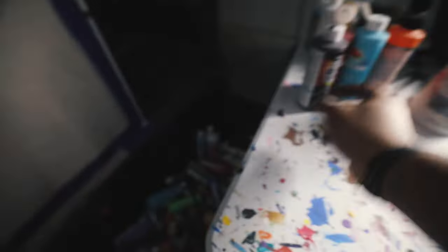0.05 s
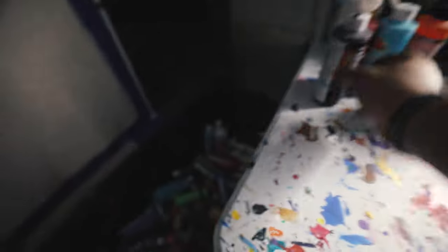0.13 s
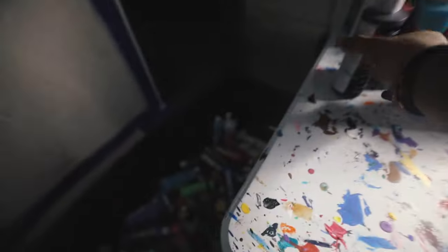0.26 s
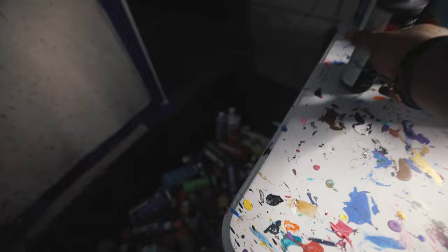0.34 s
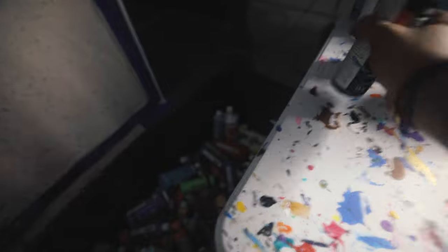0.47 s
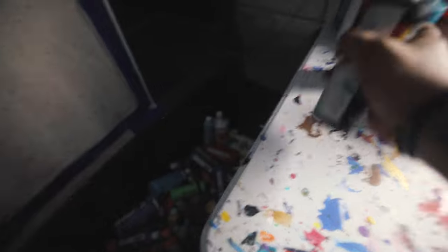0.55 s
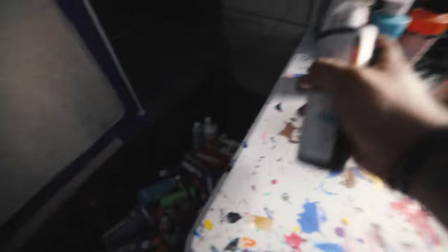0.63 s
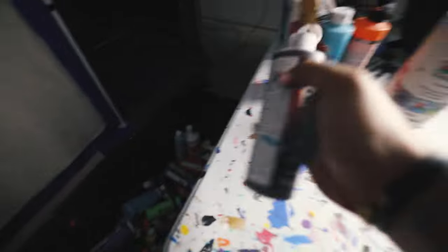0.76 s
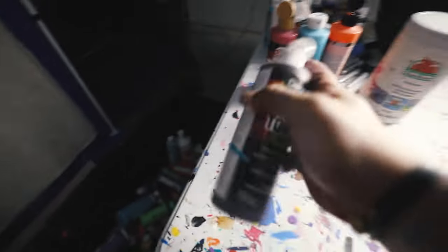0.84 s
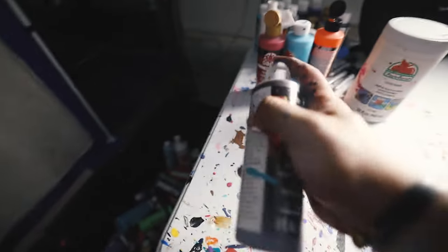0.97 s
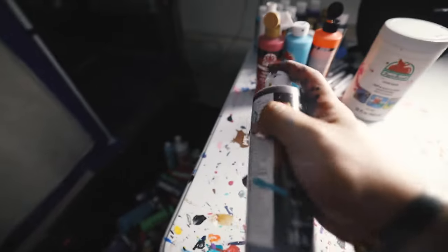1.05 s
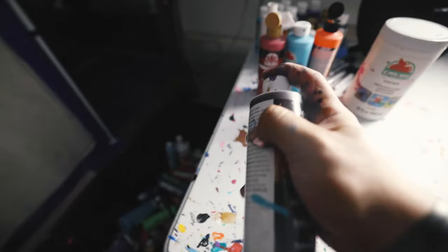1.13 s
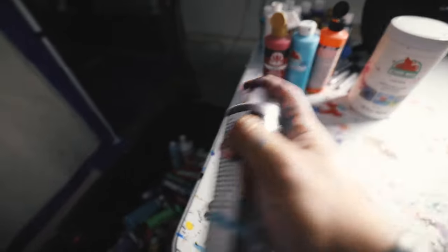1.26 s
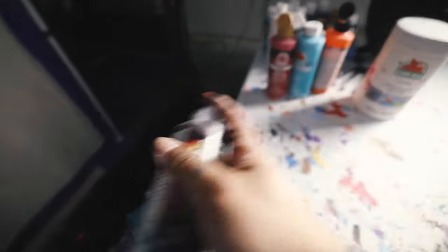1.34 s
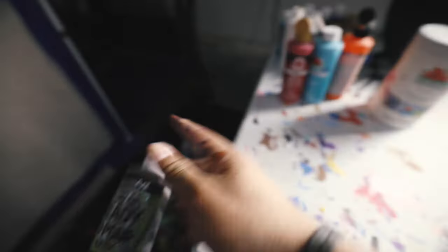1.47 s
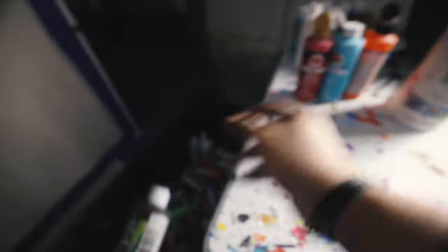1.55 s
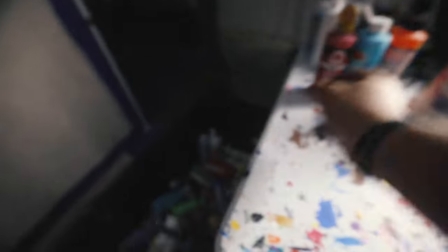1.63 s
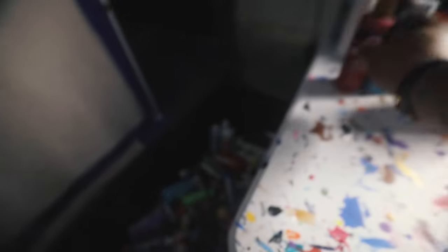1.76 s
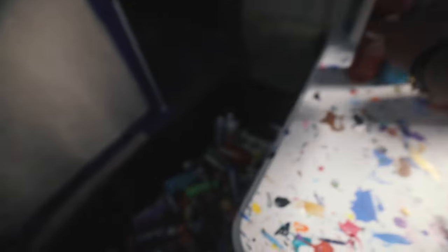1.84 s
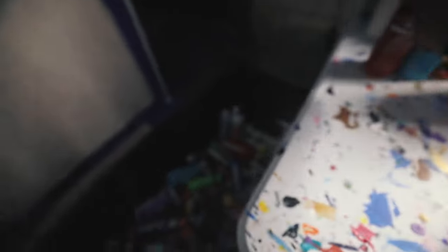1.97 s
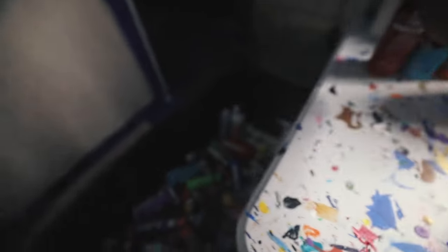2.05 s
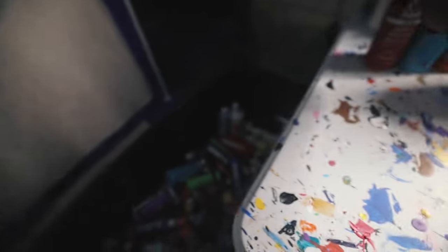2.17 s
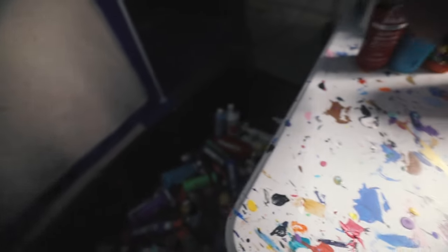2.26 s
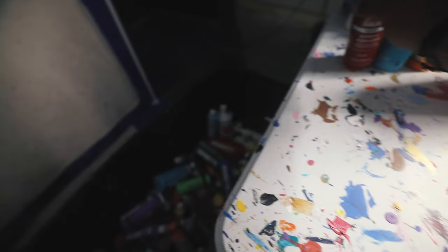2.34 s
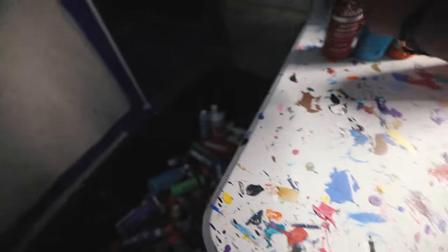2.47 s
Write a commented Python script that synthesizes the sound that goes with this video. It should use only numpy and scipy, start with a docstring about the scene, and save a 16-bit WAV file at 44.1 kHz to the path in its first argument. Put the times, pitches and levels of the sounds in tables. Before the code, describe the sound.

Two hollow plastic bottle set-downs on a light table, separated by a sharp cap click and puff

```python
"""Plastic squeeze bottles are set down on a light hollow tabletop: each rim touches, lands and rocks in small taps
of coloured noise, flat bases ring the bottle hollow, and the tabletop booms a moment later as a swelling low tone.
A bottle in the hand rustles as grainy hiss; its cap ticks and snaps as struck resonances and lets out a puff of air.
A small hard room answers with decaying noise, over a faint mains hum and room air made of filtered noise."""
import sys
import numpy as np
from scipy import signal
from scipy.fft import rfft, irfft, next_fast_len
from scipy.io import wavfile
from scipy.ndimage import map_coordinates

SR = 44100
rng = np.random.default_rng(int(sys.argv[2]) if len(sys.argv) > 2 else 0)


def put_to_file(sound):
    """Save the sound as 16-bit audio at rate SR, in the file named by the first command-line argument."""
    columns = np.atleast_2d(sound).T  # one column per channel
    safe = np.clip(columns, -1, 1)
    whole_steps = np.round(safe * 32767)
    wavfile.write(sys.argv[1], SR, whole_steps.astype(np.int16))


def gain_from_decibels(decibels):
    """Convert decibel values to linear amplitude factors."""
    exponent = np.asarray(decibels, float) / 20
    return 10 ** exponent


N = 110250
SECONDS = np.arange(N) / SR


def unit(x):
    """Normalisation: scales a signal to rms 1."""
    return x / np.sqrt(np.mean(x ** 2) + 1e-20)


def along(points, hz):
    """Interpolation of (Hz, value) points on a logarithmic frequency axis."""
    f, v = np.transpose(points)
    return np.interp(np.log(hz + 1), np.log(f + 1), v)


def filtered(x, response):
    """Linear filtering: multiplies the spectrum of x by a response of frequency."""
    m = next_fast_len(len(x) + 4096)
    spectrum = rfft(x, m) * response(np.fft.rfftfreq(m, 1 / SR))
    return irfft(spectrum, m)[:len(x)]


def coloured_noise(length, spectrum):
    """Spectral shaping: white noise filtered to a table of (Hz, dB), at rms 1."""
    return unit(filtered(rng.standard_normal(length), lambda hz: gain_from_decibels(along(spectrum, hz))))


def wobble(rate):
    """Slow random modulation: a smooth curve through random knots, rate of them a second."""
    knots = rng.standard_normal(int(N * rate / SR) + 4)
    return map_coordinates(knots, [SECONDS * rate])


def modes(table, order=1):
    """Modal superposition: the causal response of summed (Hz, width in Hz, dB) resonances."""
    def response(f):
        total = 0
        for k, (centre, width, db) in enumerate(table):
            resonance = 1j * f * width / (centre ** 2 - f ** 2 + 1j * f * width)
            sign = (-1) ** (k * order)  # order 1 alternates in polarity
            total = total + sign * gain_from_decibels(db) * resonance ** order
        return total
    return response


def tilt(hz, db_per_octave):
    """Spectral slope: pivots about 2 kHz and is flat below 800 Hz."""
    return gain_from_decibels(db_per_octave * np.log2(np.maximum(hz, 800) / 2000))


def add(track, s, sound):
    """Superposition: mixes a sound into the track at s seconds."""
    part = track[round(s * SR):][:len(sound)]
    part += sound[:len(part)]


def room(x):
    """Reverberation: convolves x with a noise tail in which each frequency decays at its own speed."""
    # Reverberation time. Each row: frequency in Hz, time to fall by 60 dB in seconds.
    decay_times = [(150, 0.81), (1000, 0.37), (4000, 0.44), (9000, 0.3), (16000, 0.33)]
    hz, t, z = signal.stft(rng.standard_normal(SR // 2), SR, nperseg=256)
    decay = gain_from_decibels(-60 * t / along(decay_times, hz)[:, None])
    tail = signal.istft(z * decay, SR, nperseg=256)[1]
    return signal.fftconvolve(x, tail / np.linalg.norm(tail))


def background():
    """Stationary noise: broadband room air, and a hum unsteady because it is narrow-band noise."""
    # Spectrum of the room air. Each row: frequency in Hz, relative density in dB per Hz.
    air_spectrum = [(18, -109), (30, -21), (125, 0.5), (235, -17.5), (298, -14.5), (409, -22.5),
                    (443, -27.5), (792, -24), (858, -19), (1310, -25), (1750, -31.5), (2890, -32.5),
                    (7470, -49.5), (14800, -51), (16500, -87)]
    # Mains hum. Each row: frequency in Hz, level in dB, bandwidth in Hz.
    hum_bands = [(115.3, -49, 8.9)]
    air_level_db = -43 + 0.17 * wobble(0.6)
    air = gain_from_decibels(air_level_db) * coloured_noise(N, air_spectrum)
    hum = np.zeros(N)
    for hz, db, width in hum_bands:
        band = filtered(rng.standard_normal(N), modes([(hz, width, 0)], order=2))
        hum += gain_from_decibels(db) * unit(band)
    return air + hum


def taps():
    """Frequency-dependent damping: each rim contact is a noise rattle whose treble dies first, with a room tail."""
    # Rim contacts. Each row: start in seconds, relative level in dB, brightness in dB per octave.
    contacts = [(.013, -20.5, -0.5), (.023, -24.5, -1), (0.2033, -8.5, 3.5), (.22, -5, 0.4),
                (.234, -16, -3.5), (0.247, -18.5, -0.5), (.369, -24, -5), (.442, -26.5, 2.5),
                (.447, -21.5, 2.5), (0.456, -22, -5), (0.469, -19, 1.7), (.496, -18.5, -3),
                (0.512, -22.5, -0.5), (0.538, -19.5, 0), (0.547, -29.5, -1.5), (0.644, -30, -11),
                (1.867, -6.5, 3.5), (1.884, -2, 3), (1.904, -15.5, -4.5), (1.915, -8.5, 2.6),
                (1.934, -20.5, 2.5), (1.954, -23.5, -10), (1.99, -20.5, -5), (2.039, -23.5, 0),
                (2.051, -29.5, -0.5), (2.111, -19, 2.5), (2.14, -26, -1), (2.226, -45, -1),
                (2.237, -23.5, 0), (2.27, -35.5, 0.3), (2.376, -31, 3.5), (2.384, -31, 3), (2.393, -36, 12)]
    # Colour of the rim. Each row: frequency in Hz, relative density in dB per Hz.
    rim_spectrum = [(150, -55), (250, 4), (522, -22.5), (728, -10), (883, -6), (2090, -7), (2670, -10),
                    (5010, -13), (11400, -27), (16500, -42)]
    level_db, room_db, rise_s = -2.5, -7.5, 0.00095
    body_t60_s, treble_t60_s, split_hz = 0.045, 0.012, 4150
    clatter_db, clatter_per_s = 3.5, 717  # uneven chatter of the rim within one contact
    out, t = np.zeros(N), SECONDS[:SR // 8]
    for s, db, bright in contacts:
        unevenness = map_coordinates(rng.standard_normal(len(t)), [t * clatter_per_s])
        chatter = gain_from_decibels(clatter_db * unevenness) * rng.standard_normal(len(t))
        rattle = unit(filtered(chatter, lambda hz: gain_from_decibels(along(rim_spectrum, hz)) * tilt(hz, bright)))
        body = filtered(rattle, lambda hz: 1 / (1 + (hz / split_hz) ** 2))
        treble = rattle - body
        dying = gain_from_decibels(-60 * t / body_t60_s) * body + gain_from_decibels(-60 * t / treble_t60_s) * treble
        tap = gain_from_decibels(db + level_db) * (1 - np.exp(-t / rise_s)) * dying
        add(out, s, tap)
        add(out, s, gain_from_decibels(room_db) * room(tap))
    return out


def booms():
    """Modal vibration: the tabletop swings up over a few cycles and dies; its other modes rumble along."""
    # Tabletop swings. Each row: start in seconds, relative level in dB, pitch in Hz, time to peak in seconds.
    swings = [(0.023, -26, 167.6, 0.02), (0.211, -12, 166, 0.013), (0.239, -1, 117, 0.018),
              (0.294, -19.5, 170, 0.018), (0.366, -27, 159, 0.014), (0.4509, -16.5, 171, 0.01),
              (0.4728, -10, 171, 0.0087), (0.503, -18.5, 117.7, 0.024), (0.548, -13, 170.4, 0.011),
              (0.609, -24, 114.4, 0.033), (0.694, -27.5, 133, 0.011), (1.874, -8.5, 148.4, 0.013),
              (1.912, -4.5, 115.7, 0.024), (1.979, -23.5, 198.5, 0.014), (2.029, -23.5, 141.6, 0.034),
              (2.05, -26, 213, 0.018), (2.112, -16.5, 171, 0.009), (2.146, -20, 111.7, 0.02),
              (2.176, -32.5, 195.3, 0.011), (2.262, -28, 180.5, 0.019), (2.375, -38, 205, 0.016)]
    # Other modes each swing stirs. Each row: frequency in Hz, width in Hz, relative level in dB.
    other_modes = [(88.6, 19.4, -5.5), (193, 57, -13.5), (317.6, 27, -21)]
    fall = 1.7  # exponent of the decay: 1 = plain, 2 = bell shape
    room_db = -13
    out, t = np.zeros(N), SECONDS[:SR // 2]
    for s, db, hz, rise in swings:
        u = t / rise
        shape = u * np.exp(-u ** fall / fall)
        tone = np.sin(2 * np.pi * hz * t)
        rumble = 20 * filtered(rng.standard_normal(len(t)), modes(other_modes, order=2))
        add(out, s, gain_from_decibels(db) * shape / shape.max() * (tone + rumble))
    return out + gain_from_decibels(room_db) * room(out)[:N]


def landings():
    """Impulse excitation: a flat base lands in one blow and the bottle rings hollow, smaller bottles higher."""
    # Bases landing. Each row: start in seconds, peak of the ring in dB, pitch ratio of the bottle.
    base_blows = [(.2205, -17, 1.26), (0.4692, -20, 1.45), (.496, -19.5, 1.274), (1.886, -4, 0.993)]
    # A standing bottle at ratio 1. Each row: frequency in Hz, width in Hz, relative level in dB.
    bottle_modes = [(745, 123, 1.5), (1017, 59, 2.5), (1745, 180, -4), (3520, 110, -7.5)]
    room_db = -7.5
    out, blow = np.zeros(N), 1. * (np.arange(SR // 20) == 0)
    for s, db, ratio in base_blows:
        scaled = [(hz * ratio, width * ratio, level) for hz, width, level in bottle_modes]
        ring = filtered(blow, modes(scaled))
        add(out, s, gain_from_decibels(db) * ring / np.abs(ring).max())
    return out + gain_from_decibels(room_db) * room(out)[:N]


def grip():
    """Sliding friction: fingers move on the plastic in short strokes of grainy hiss."""
    # Strokes. Each row: start in seconds, length in seconds, level in dB.
    slides = [(0.554, 0.48, -55.5), (0.609, 0.12, -54.5), (0.783, 0.063, -57.5), (0.929, 0.016, -50.5),
              (1.088, 0.054, -59), (1.399, 0.086, -54), (2.465, 0.065, -57.5)]
    # Colour of the friction. Each row: frequency in Hz, relative density in dB per Hz.
    skin_spectrum = [(710, -17), (1200, -10.5), (1940, 0), (3880, -6), (11900, -14), (16500, -28)]
    edge_s, fade_s = 0.01, 0.014
    strokes = np.zeros(N)
    for s, length, db in slides:
        rising = (SECONDS - s) / edge_s
        falling = 1 + (s + length - SECONDS) / fade_s
        strokes += gain_from_decibels(db) * np.clip(np.minimum(rising, falling), 0, 1)
    grain_db = 3.5 * wobble(2400) + 1.0 * wobble(36.0)  # fine grains on a slower swell
    grain = gain_from_decibels(grain_db) * rng.standard_normal(N)
    return strokes * unit(filtered(grain, lambda hz: gain_from_decibels(along(skin_spectrum, hz))))


def snaps():
    """Stick-slip and impact: milliseconds of slipping ring the cap, one sharp knock rings the bottle wall."""
    # Cap ticks and snaps. Each row: start in seconds, relative levels of cap and wall in dB, slip length in seconds.
    clicks = [(0.937, -38, -53, 0.0033), (1.114, -40, -35.5, 0.0024), (1.143, -35, -34, 0.004),
              (1.17, -32.5, -34, 0.0046), (1.1802, -15, -4, 0.0024), (1.2233, -2, -14, 0.0034),
              (1.421, -21.5, -52, 0.00061), (1.477, -38.5, -34, 0.0025)]
    # Cap resonances. Each row: frequency in Hz, width in Hz, relative level in dB.
    cap_modes = [(365, 160, -1.5), (2286, 530, 5), (2740, 1250, 3), (3490, 740, -2), (4820, 900, -0.5),
                 (6500, 510, -7), (8300, 2900, -11.5), (11850, 1200, -15)]
    # Bottle wall resonances. Each row: frequency in Hz, width in Hz, relative level in dB.
    wall_modes = [(316, 500, -7.5), (910, 610, 0), (1346, 200, 0), (1816, 490, 3), (2145, 270, 0)]
    level_db, room_db = -7.5, -16
    out, t = np.zeros(N), SECONDS[:SR // 20]
    blow = 1. * (np.arange(len(t)) == 20)
    for s, cap_db, wall_db, length in clicks:
        u = t / length
        slip = np.sqrt(u) * np.exp(-u ** 4) * rng.standard_normal(len(t))
        slip /= np.linalg.norm(slip)
        cap_push = slip + 0.97 * np.roll(blow, 40)  # the catch lets go beside the slipping
        wall_push = blow + 0.2 * slip  # a little scraping beside the blow
        for db, body, push in ((cap_db, cap_modes, cap_push), (wall_db, wall_modes, wall_push)):
            near = filtered(push, modes(body, order=2))
            far = filtered(blow, modes(body, order=2))
            gain = gain_from_decibels(db + level_db) * np.sqrt(length * SR)  # longer slips carry more energy
            add(out, s, gain * near / np.linalg.norm(near))
            add(out, s, gain * gain_from_decibels(room_db) * room(far / np.linalg.norm(far)))
    return out


def puff():
    """Turbulent jet noise: air escaping from the opened cap swells quickly and fades as hiss."""
    # Colour of the jet. Each row: frequency in Hz, relative density in dB per Hz.
    jet_spectrum = [(880, -48), (1500, -26), (2150, -5), (3630, -3.5), (4260, 4), (7390, -23), (8860, -16),
                    (13200, -32), (15500, -39.5), (16500, -64)]
    start_s, level_db, t60_s, rise_s = 1.228, -33.5, 0.48, 0.026
    out, t = np.zeros(N), SECONDS[:SR // 2]
    envelope = gain_from_decibels(level_db - 60 * t / t60_s) * (1 - np.exp(-t / rise_s))
    add(out, start_s, envelope * coloured_noise(len(t), jet_spectrum))
    return out


def scene():
    """Superposition of all sources at one microphone."""
    mix = background() + taps() + booms() + landings() + grip() + snaps() + puff()
    return mix[None]


def band_limit(x):
    """A steep low-pass at the top of the band."""
    return signal.sosfilt(signal.butter(12, 16810, fs=SR, output="sos"), x)


def record(dry):
    """Band-limiting and saturation: a small microphone without deep bass, soft clipping, a sharp treble edge."""
    low_hz, top_hz, ceiling = 70.2, 16800, 1.3
    mic = filtered(dry[0], lambda hz: (1j * hz / (low_hz + 1j * hz)) ** 4)
    clipped = mic / (1 + np.abs(mic / ceiling) ** 6) ** (1 / 6)
    finished = filtered(clipped, lambda hz: hz < top_hz)[None]
    return band_limit(finished)


dry = scene()
out = record(dry)
put_to_file(out)
```